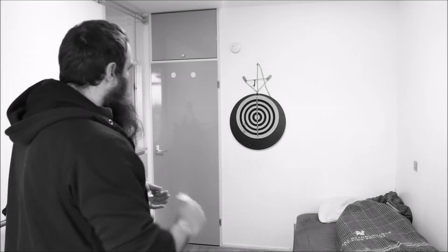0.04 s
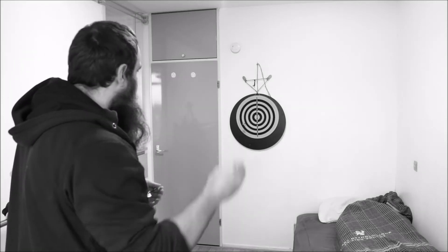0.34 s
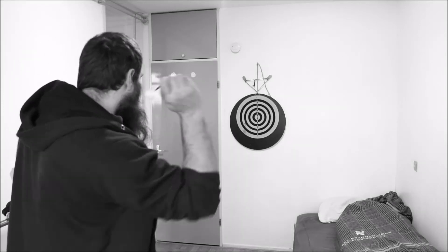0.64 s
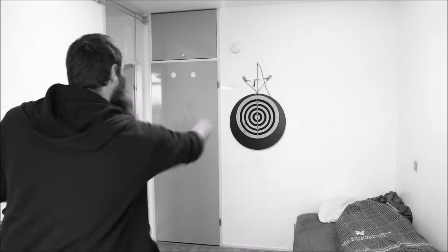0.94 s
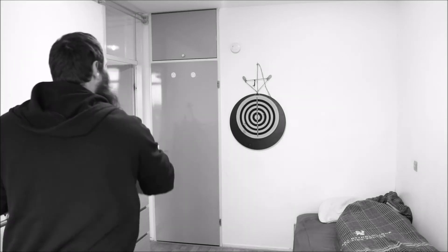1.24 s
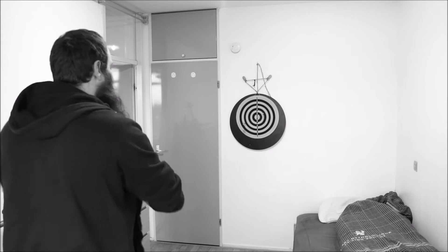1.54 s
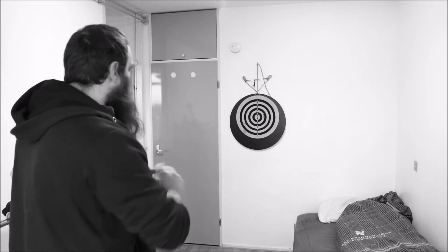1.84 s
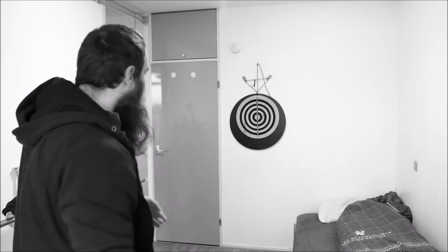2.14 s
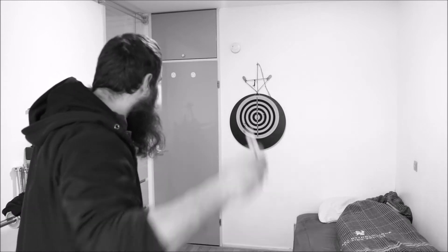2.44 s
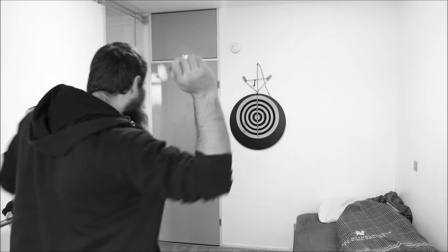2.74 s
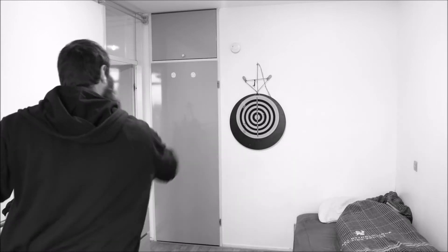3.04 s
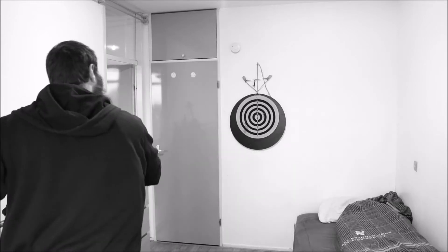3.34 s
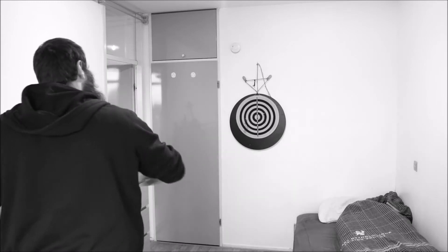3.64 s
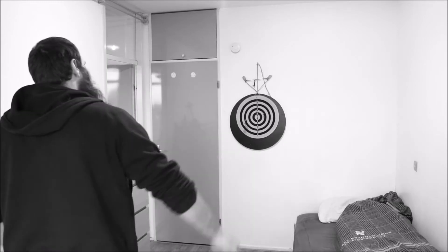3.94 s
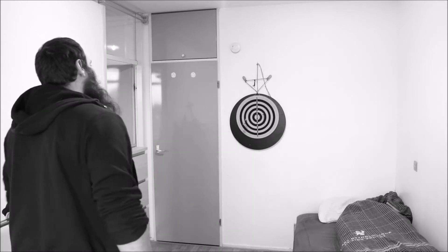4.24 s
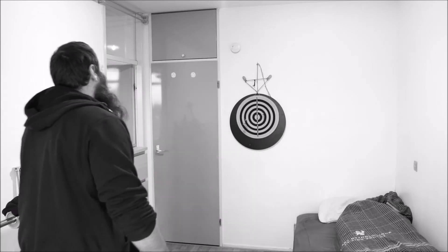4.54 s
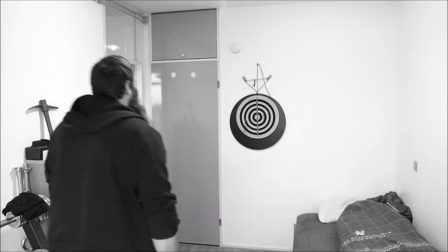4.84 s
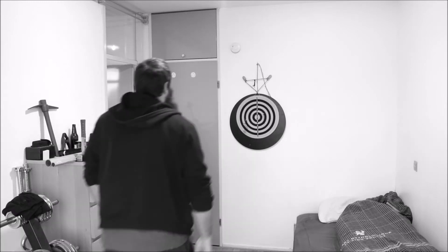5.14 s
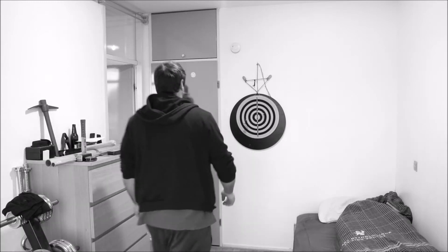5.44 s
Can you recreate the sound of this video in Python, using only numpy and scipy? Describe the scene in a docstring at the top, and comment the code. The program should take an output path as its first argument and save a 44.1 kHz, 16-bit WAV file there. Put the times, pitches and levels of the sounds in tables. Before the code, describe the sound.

Two darts hit a board on the wall of a small, bare room, about two seconds apart. Each lands with a tick, a crack and a ringing thud, and its shaft rattles. A sleeve swishes before each throw and spare darts clink in between. After the second hit the board taps the wall, then soft footsteps and floor knocks follow. A stereo pair inside the room also picks up a faint hum.

```python
"""Two darts thud into a board on the wall of a small, bare room, heard from a stereo pair inside it.
Each point ticks in, the board cracks against the wall, both ring on and the shaft rattles;
the hit pushes the limiter down for a moment. After the second, the board rocks and taps the wall.
Around the throws the man's sleeves swish, spare darts clink in his hand and the floor knocks and
squeaks under him. Behind it all lie a murmur of air and a faint hum."""
import sys
import numpy as np
from scipy import signal
from scipy.fft import rfft, irfft
from scipy.io import wavfile
from scipy.ndimage import uniform_filter1d

SR = 44100
rng = np.random.default_rng(int(sys.argv[2]) if len(sys.argv) > 2 else 0)


def bounce(signal):
    """Save signal as a 16-bit WAV file at the path given by the first command-line argument."""
    frames = np.transpose(np.atleast_2d(signal))
    limited = np.clip(frames, -1, 1)
    pcm = np.round(limited * 32767).astype(np.int16)
    wavfile.write(sys.argv[1], SR, pcm)


N = 250929


def amp(db):
    return 10 ** (np.asarray(db) / 20)


def unit_rms(x):
    return x / np.sqrt(np.mean(x ** 2) + 1e-20)


def curve_at(points, hz):
    f, value = np.transpose(points)
    return np.interp(np.log(hz + 1), np.log(f + 1), value)


def add(mix, start, sound):
    part = mix[:, max(round(start * SR), 0):][:, :sound.shape[1]]
    part += sound[:, :part.shape[1]]


def drift(size, hz):
    """A smooth random wander of rms 1, mostly slower than hz."""
    f = np.fft.rfftfreq(size, 1 / SR)
    return unit_rms(irfft(rfft(rng.standard_normal(size)) / (1 + (f / hz) ** 2) ** 2, size))


def swells(moves, fade_db_per_s):
    """Gain over time: each move gathers speed along a bell curve, then dies away evenly in dB."""
    t, power = np.arange(N) / SR, np.zeros(N)
    for peak, build, db in moves:
        before, after = np.maximum(peak - t, 0), np.maximum(t - peak, 0)
        power += amp(db - fade_db_per_s * after) ** 2 * np.exp(-(before / build) ** 2)
    return np.sqrt(power)


# How alike the room sounds at the two microphones. Each row: frequency in Hz, coherence from 0 to 1.
COHERENCE = [(50, 0.97), (150, 0.96), (280, 0.97), (450, 0.82), (750, 0.26), (1200, 0.5), (2200, 0.31),
             (3300, 0.076), (5500, 0.047), (15000, 0)]
def diffuse(colour, size, likeness=1):
    """Noise from all sides, alike left and right in the bass; more likeness narrows the image."""
    hz = np.fft.rfftfreq(size, 1 / SR)
    coherence = np.clip(curve_at(COHERENCE, hz), 0, 1) ** (1 / likeness)
    mid, side = np.exp(2j * np.pi * rng.random((2, len(hz)))) * np.sqrt([1 + coherence, 1 - coherence])
    return unit_rms(irfft(np.array([mid + side, mid - side]) * amp(curve_at(colour, hz)), size))


# The bare room's reverberation. Each row: frequency in Hz, seconds to fall by 60 dB.
ROOM_T60 = [(45, 1.35), (100, 0.78), (170, 0.56), (350, 0.51), (700, 0.64), (1100, 0.65), (2000, 0.6),
            (4000, 0.55), (8000, 0.45), (16000, 0.27)]
def blow(colour, rise_s, damping=1, early_db=-20, early_s=0.034, likeness=1):
    """A short blow heard through the room: early reflections, then each band dies at its own speed."""
    hz, frame_s, bands = signal.stft(diffuse(colour, SR, likeness), SR, nperseg=512)
    # a random ripple makes the treble slightly uneven and notchy
    ripple_db = 4.5 * uniform_filter1d(rng.standard_normal(len(hz)), size=3) * hz / (hz + 1500)
    decay_db = 60 * frame_s * damping / curve_at(ROOM_T60, hz)[:, None]
    tail = signal.istft(bands * amp(ripple_db[:, None] - decay_db), SR, nperseg=512)[1][:, :SR]
    t = np.arange(SR) / SR
    return tail * (1 - np.exp(-t / rise_s)) * (1 + amp(early_db) * np.exp(-t / early_s))


# The still room at the microphones. Each row: frequency in Hz, level in dB per Hz.
AIR_COLOUR = [(22, -34), (42, -19), (65, -10), (100, -21), (160, -3.5), (230, -3.5), (350, -3), (520, -18),
              (900, -23), (1400, -20), (2700, -19.5), (7000, -25), (15500, -28)]
# The room's hum. Each row: frequency in Hz, level in dB.
HUM_TONES = [(45.5, -75), (137, -66.5), (172, -68.5), (230, -61), (308, -79)]
def room_tone(air_db=-54, waver_rad=0.38):
    """Low murmur of air, microphone hiss and a wavering hum."""
    t, hum = np.arange(N) / SR, np.zeros(N)
    for hz, db in HUM_TONES:
        tone = np.sqrt(2) * np.sin(2 * np.pi * hz * t + waver_rad * drift(N, 15))
        hum += amp(db) * tone * (1 + 0.31 * drift(N, 3.8))
    return amp(air_db) * diffuse(AIR_COLOUR, N, likeness=0.14) + hum


# Rubbing cloth. Each row: frequency in Hz, level in dB per Hz.
CLOTH_COLOUR = [(60, -10), (250, -1.5), (600, 4.5), (1300, 0), (2500, 1), (4000, 0), (6500, -2),
                (9000, -6.5), (15500, -12)]
# Moves of arm or body. Each row: fastest moment in seconds, build-up in seconds, level in dB.
SLEEVE_MOVES = [(.55, .05, -60.5), (.875, 0.028, -42), (1.99, 0.033, -60.5), (2.78, 0.058, -48),
                (2.94, 0.11, -51.5), (4.31, 0.048, -55), (4.55, .1, -59.5), (4.851, 0.0034, -46.5),
                (4.97, 0.015, -48.5), (5.06, 0.024, -43.5), (5.32, 0.072, -56), (5.47, 0.019, -53.5),
                (5.675, 0.03, -44)]
def sweater(rest_db=-64, flutter_db=0.06):
    """Cloth swishes as the arm winds up and as he walks off; it never lies quite still."""
    rubbing = np.hypot(swells(SLEEVE_MOVES, fade_db_per_s=108), amp(rest_db))
    return diffuse(CLOTH_COLOUR, N, likeness=0.52) * rubbing * amp(flutter_db * drift(N, 120))


# Friction down at the floor. Each row: frequency in Hz, level in dB per Hz.
SOLE_COLOUR = [(100, 6.5), (300, 3), (600, 4.5), (1300, 1.5), (2200, -3.5), (4000, -36.5), (16000, -77)]
# Shifts of weight. Each row: fastest moment in seconds, build-up in seconds, level in dB.
SOLE_SLIDES = [(.02, .1, -50.5), (2.0, .08, -57), (2.91, 0.14, -49), (3.72, 0.15, -51), (4.25, 0.2, -53)]
def sliding_soles(rest_db=-57, uneven_db=1.4):
    """Soles rub unevenly over the floor as he shifts his weight."""
    sliding = np.hypot(swells(SOLE_SLIDES, fade_db_per_s=29.5), amp(rest_db))
    return diffuse(SOLE_COLOUR, N, likeness=0.17) * sliding * amp(uneven_db * drift(N, 25))


# The floor's low boom. Each row: frequency in Hz, level in dB per Hz.
FLEX_COLOUR = [(25, -24), (45, 9), (70, -5), (130, -21), (220, 2.5), (400, -47), (2000, -70)]
# Strides. Each row: moment of full weight in seconds, build-up in seconds, level in dB.
FLEX_STRIDES = [(5.02, .05, -54), (5.32, 0.062, -48.5), (5.64, .04, -57)]
def flexing_floor():
    """The floor bends under each stride as he walks off."""
    return diffuse(FLEX_COLOUR, N) * swells(FLEX_STRIDES, fade_db_per_s=90)


# Heel tick, footfall, floorboard knock and shoe scuff. Each row: frequency in Hz, level in dB per Hz.
HEEL_COLOUR = [(300, 9.5), (1400, -2), (2600, 3), (3500, -14), (6300, -20), (8000, -2), (10000, -21),
               (16000, -28)]
STEP_COLOUR = [(30, -17), (70, 5.5), (120, -8), (165, 16), (230, 4.5), (400, -5), (900, -31), (2600, -45),
               (16000, -65)]
KNOCK_COLOUR = [(60, -40), (170, 0.5), (300, 2), (550, -9), (950, 3.5), (1130, -3), (1330, 4.5), (1550, -7),
                (1900, -10), (3000, -17), (4500, -37), (8000, -31), (16000, -59)]
SCUFF_COLOUR = [(100, -8), (250, -14), (370, 9.5), (520, 11.5), (750, 4), (1200, -21), (3000, -26),
                (16000, -36)]
# His steps. Each row: start in seconds, level in dB, heel tick in dB relative to that level.
FOOTFALLS = [(0, -41, -29), (0.469, -48.5, -21), (0.635, -47.5, -11), (1.886, -44, -30), (2.191, -55, -20),
             (3.709, -53, -6), (3.875, -37, -9)]
# Knocks and scuffs underfoot. Each row: start in seconds, level in dB.
FLOOR_KNOCKS = [(0, -42.5), (3.918, -31.5), (4.276, -51), (4.431, -55.5), (4.588, -54.5)]
SHOE_SCUFFS = [(.004, -44), (2.735, -53), (3.72, -52), (4.846, -53), (5.01, -50), (5.563, -48.5),
               (5.612, -46.5)]
def footsteps():
    """The heel ticks just before the weight lands; a loose floorboard knocks and shoes scuff dully."""
    out = np.zeros((2, N))
    for start, db, heel_db in FOOTFALLS:
        heel = blow(HEEL_COLOUR, rise_s=0.0006, damping=1.4, early_db=-2, early_s=0.008)
        weight = blow(STEP_COLOUR, rise_s=0.017, damping=1.77, early_db=2, early_s=0.026)
        add(out, start, amp(db + heel_db) * heel)
        add(out, start + 0.00482, amp(db) * weight)
    for start, db in FLOOR_KNOCKS:
        knock = blow(KNOCK_COLOUR, rise_s=0.0025, damping=1.3, early_db=-0.5, early_s=0.0093, likeness=2)
        add(out, start, amp(db) * knock)
    for start, db in SHOE_SCUFFS:
        scuff = blow(SCUFF_COLOUR, rise_s=0.0061, damping=3.6, early_db=0.5, early_s=0.025)
        add(out, start, amp(db) * scuff)
    return out


# Squeaks underfoot. Each row: start and length in seconds, first and last pitch in Hz, level in dB.
FLOOR_SQUEAKS = [(2.576, 0.13, 1780, 1652, -59.5), (2.669, 0.12, 1665, 1840, -58),
                 (2.86, 0.12, 1565, 1573, -48), (2.828, 0.173, 776, 797, -56.5),
                 (3.021, 0.06, 1790, 1770, -51.5), (3.42, 0.044, 1780, 1730, -50),
                 (3.585, 0.056, 1788, 1784, -51.5), (3.588, 0.058, 1367, 1338, -51)]
def squeaks(waver=0.018, rough=0.35):
    """Wood slips on wood under his weight with a thin, uneven tone that lingers in the room."""
    out = np.zeros((2, N))
    for start, length, first_hz, last_hz, db in FLOOR_SQUEAKS:
        size = int(length * SR)
        hz = np.linspace(first_hz, last_hz, size) * (1 + waver * drift(size, 190))
        tone = np.sin(2 * np.pi * np.cumsum(hz) / SR)
        tone *= np.hanning(size) * (1 + rough * drift(size, 160))
        room = blow(SOLE_COLOUR, rise_s=0.001, damping=1.1, early_db=4, early_s=0.008)
        wet = signal.fftconvolve(tone[None], room, axes=1)
        add(out, start, amp(db) * wet / np.sqrt(np.sum(wet ** 2) / (2 * size)))
    return out


# A dart's resonances. Each row: frequency in Hz, width in Hz, level in dB.
BARREL_MODES = [(1940, 110, 4.5), (2170, 330, 0.5), (4860, 630, -1), (5100, 320, -35), (7240, 480, -4.5),
                (9360, 530, -3.5), (11000, 300, -4), (13800, 1900, -10)]
# Darts touching in his hand. Each row: start in seconds, level in dB, rise in seconds, pitch factor.
HAND_CLINKS = [(0.331, -52, 0.016, 0.74), (1.346, -36.5, 0.034, 1), (1.594, -43.5, 0.025, 0.96),
               (1.666, -40.5, 0.0064, 0.93), (1.8, -48.5, 0.019, 1.04), (2.105, -52.5, 0.013, 0.82),
               (4.846, -61, .001, 1.16)]
def clinks():
    """Spare darts knock and slide against each other; the grip shifts their ring."""
    out, hz = np.zeros((2, N)), np.linspace(0, SR / 2, num=1024)
    for start, db, rise_s, grip in HAND_CLINKS:
        power = sum(amp(mode_db) ** 2 / (1 + (2 * (hz - mode_hz * grip) / width) ** 2)
                    for mode_hz, width, mode_db in BARREL_MODES)
        colour = np.transpose([hz, 10 * np.log10(power)])
        add(out, start, amp(db) * blow(colour, rise_s, damping=1.4, early_db=3, early_s=0.007))
    return out


# A hollow tap. Each row: frequency in Hz, level in dB per Hz.
TAP_COLOUR = [(200, -24), (780, -20), (930, 5), (1100, -17), (1800, -13), (3000, -28), (16000, -60)]
# Taps over at the wall. Each row: start in seconds, level in dB.
BOARD_TAPS = [(3.385, -43), (3.482, -45.5)]
def rocking_board():
    """The board swings on its cord after a hard hit and settles with light taps on the wall."""
    out = np.zeros((2, N))
    for start, db in BOARD_TAPS:
        add(out, start, amp(db) * blow(TAP_COLOUR, rise_s=0.0036, damping=1.9, early_db=2, early_s=0.015))
    return out


# Modes of board and wall. Each row: frequency in Hz, level in dB for the first dart, then the second.
WALL_MODES = [(44.9, -23, -38), (169, -7.5, -19), (173, -23, -14), (223.1, -9, -6.5), (231.3, 1, -7.5),
              (273.6, -6, -9), (293.6, -4, -4.5), (321.3, 0, 2), (363.7, -0.5, -2), (397.7, -7, -6.5),
              (446.6, -4, -3), (450.6, -1, -7.5), (471, -4.5, -3), (590, -6.5, -26), (602, -18, -14),
              (642.4, -9.5, -7.5), (648.5, -21, -9), (683, -14.5, -9.5), (919, -5, 0), (984, -20, -11),
              (1028, -21, -31), (1124, -29, -23), (1100, -17, -19), (1167, -12, -10.5), (1290, -10, -34),
              (1452, -11.5, -17), (1582, -15, -20), (1670, -34, -15), (2105, -30, -14)]
def wall_ring(levels_db, build_cycles=6, linger=0.99, beat=0.54, beat_hz=12, width=0.48):
    """The struck board and wall swell over a few cycles, beat unevenly and die with the room."""
    t, out = np.arange(SR) / SR, np.zeros((2, SR))
    for (hz, *_), db in zip(WALL_MODES, levels_db):
        spread = width * np.arccos(np.clip(curve_at(COHERENCE, hz), -1, 1)) * rng.choice([-1, 1])
        phase = 2 * np.pi * (hz * t + rng.random()) + np.array([[spread], [-spread]])
        wave = np.sin(phase) * (1 + beat * drift(SR, beat_hz))
        wave += np.cos(phase) * beat * drift(SR, beat_hz)
        decay = np.exp(-np.log(1000) * t / (linger * curve_at(ROOM_T60, hz)))
        out += wave * amp(db) * decay * (1 - np.exp(-t * hz / build_cycles))
    return out


def brightened(colour, db, centre_hz=1900):
    """The hardness of the spot that is hit lifts or lowers the upper mids."""
    return [(hz, level + db * np.exp(-np.log2(hz / centre_hz) ** 2)) for hz, level in colour]


# Point's tick, board's crack and thud, shaft's rattle. Each row: frequency in Hz, level in dB per Hz.
TICK_COLOUR = [(100, -8), (800, 8), (2500, -15), (6000, -2), (16000, -10)]
CRACK_COLOUR = [(100, -28), (400, -3), (750, 5), (1400, -12), (2000, -13), (2700, -19), (4000, -40),
                (16000, -53)]
THUD_COLOUR = [(25, -44), (50, -21), (100, -18), (150, -11), (230, 1), (400, -3), (540, -3.5), (750, -1),
               (1200, 0), (1800, -6.5), (2700, -12), (3500, -20.5), (6000, -27.5), (16000, -49.5)]
RATTLE_COLOUR = [(800, -37), (2000, -14), (2900, -2.5), (3350, -6.5), (4100, -6.5), (4700, -10), (5600, -7),
                 (7500, -15.5), (12000, -19), (16000, -26)]
# Darts landing. Each row: start in seconds, levels of thud, ring and rattle in dB,
# rattle delay in seconds, tick level in dB, brightness in dB.
DART_HITS = [(1.096, -10, -12.5, -21.5, 0.014, -15.5, -2), (3.0854, -9.5, -14, -29, .003, -18, -1)]
def darts(crack_db=-2):
    """The point ticks into the board, the board cracks and thuds against the wall, the shaft rattles."""
    out, t = np.zeros((2, N)), np.arange(SR) / SR
    for hit, levels_db in zip(DART_HITS, np.transpose(WALL_MODES)[1:]):
        start, thud_db, ring_db, rattle_db, delay, tick_db, bright_db = hit
        tick = diffuse(TICK_COLOUR, SR) * (t / 0.00089) * np.exp(-t / 0.00064)
        # the board's face speaks straight to both microphones before the room answers
        crack = diffuse(brightened(CRACK_COLOUR, bright_db), SR, likeness=5.5)
        crack *= (t / 0.0021) * np.exp(-t / 0.0022)
        thud = blow(brightened(THUD_COLOUR, bright_db), rise_s=0.01, likeness=1.7)
        add(out, start, amp(tick_db) * tick + amp(thud_db + crack_db) * crack + amp(thud_db) * thud)
        add(out, start, amp(ring_db) * wall_ring(levels_db))
        rattle = blow(RATTLE_COLOUR, rise_s=0.01, damping=1.2, early_db=0)
        add(out, start + delay, amp(rattle_db) * rattle)
    return out


def scene():
    """The room, the thrower and the board as they reach the microphones."""
    thrower = sweater() + sliding_soles() + flexing_floor() + footsteps() + squeaks() + clinks()
    return room_tone() + thrower + rocking_board() + darts()


def gain_cut(over_db, recover_db_per_s):
    """A cut in dB that sets in at once and lets go at a steady rate."""
    fall = np.arange(N) * recover_db_per_s / SR
    return np.maximum.accumulate(over_db + fall) - fall


def record(dry, limit_db=-15.5, duck_above_db=-28, duck_db=3, edge_hz=15850):
    """Two slightly unequal microphones, a look-ahead limiter with a slow, shallow duck, a low-pass."""
    # Each row: frequency in Hz, left microphone over right in dB.
    mismatch = [(60, -0.36), (160, -2), (330, -0.76), (600, 0.42), (2500, 1), (15000, 0.4)]
    lean_db = curve_at(mismatch, np.fft.rfftfreq(N, 1 / SR))
    heard = irfft(rfft(dry) * amp(np.array([lean_db, -lean_db]) / 2), N)
    power = uniform_filter1d((heard ** 2).mean(0), size=400)
    power_db = 10 * np.log10(abs(power) + 1e-12)
    quick_db = gain_cut(power_db - limit_db, recover_db_per_s=62)
    slow_db = gain_cut(np.clip(power_db - duck_above_db, 0, duck_db), recover_db_per_s=4.5)
    limited = heard / amp(uniform_filter1d(np.maximum(quick_db, slow_db), size=200))
    low_pass = signal.firwin(511, edge_hz, window=("kaiser", 9), fs=SR)
    return signal.oaconvolve(limited, low_pass[None], "same")


dry = scene()
out = record(dry)
bounce(out)
```